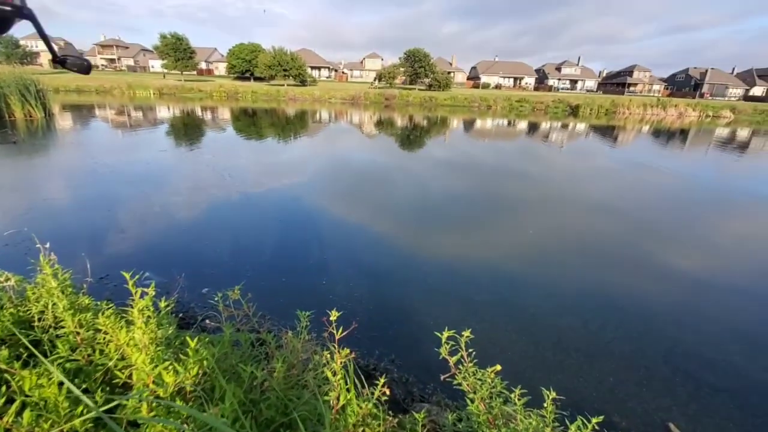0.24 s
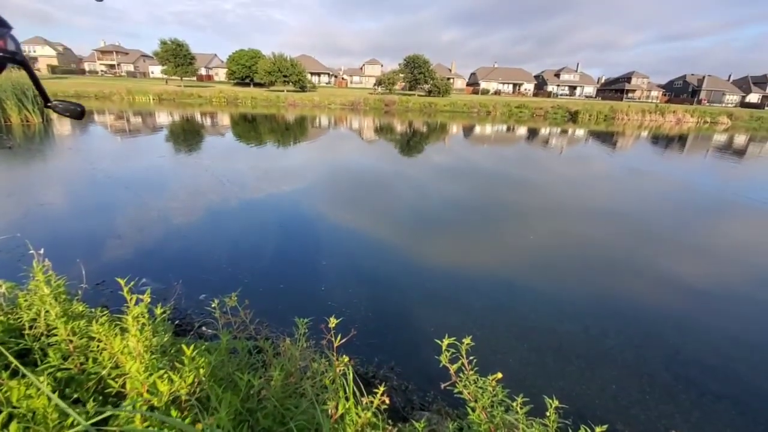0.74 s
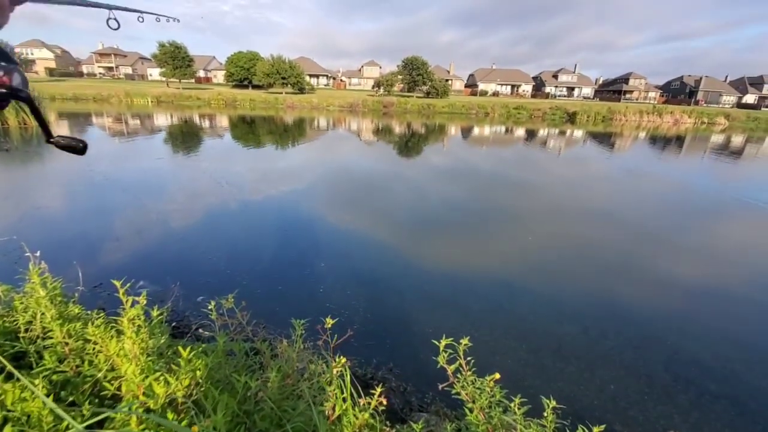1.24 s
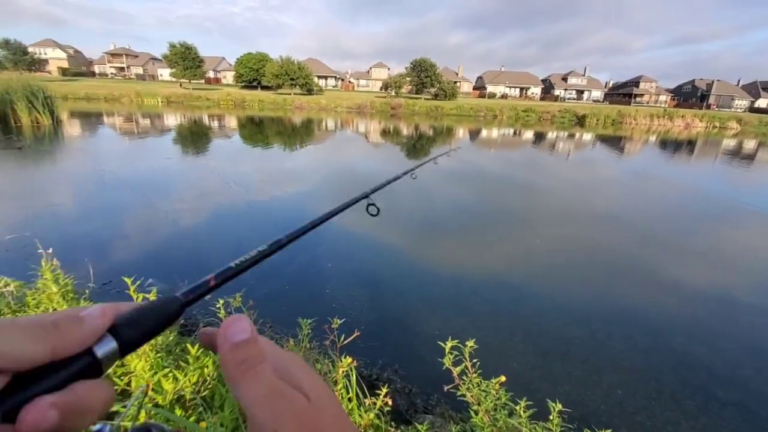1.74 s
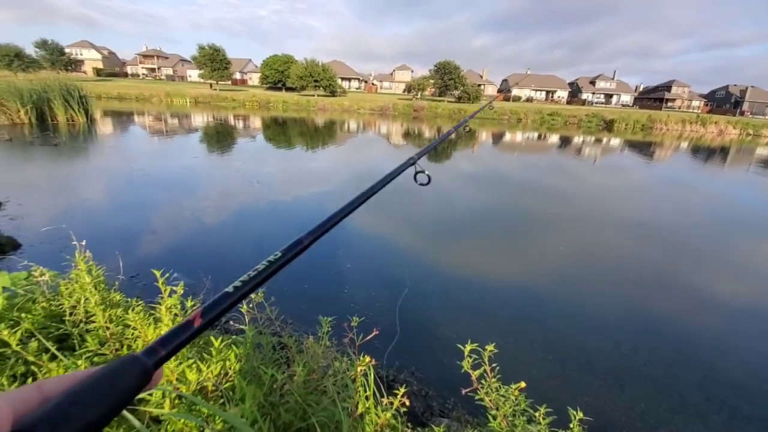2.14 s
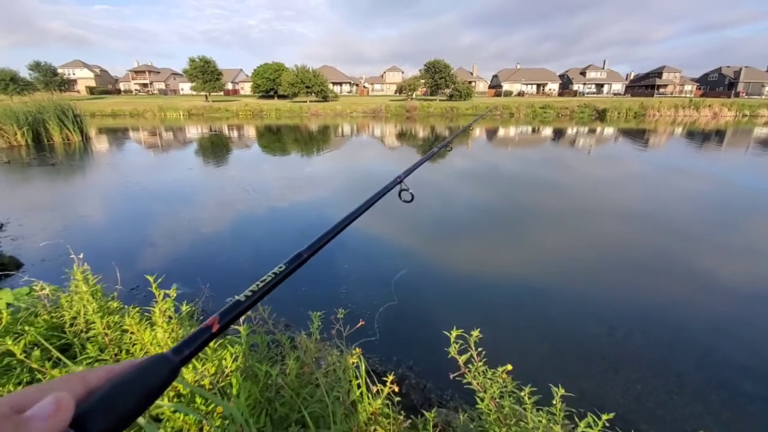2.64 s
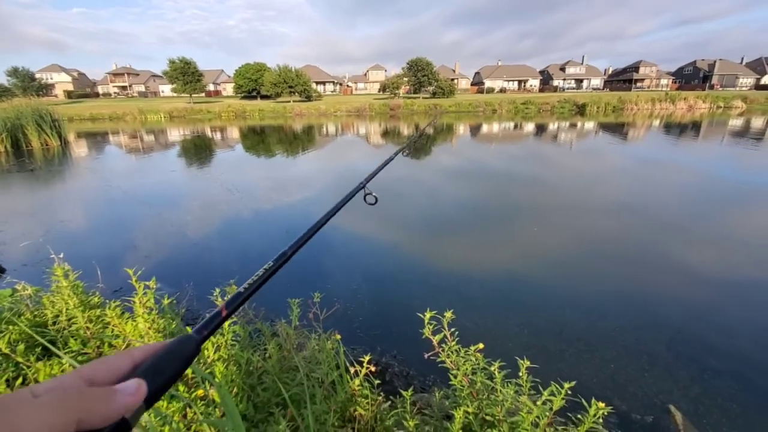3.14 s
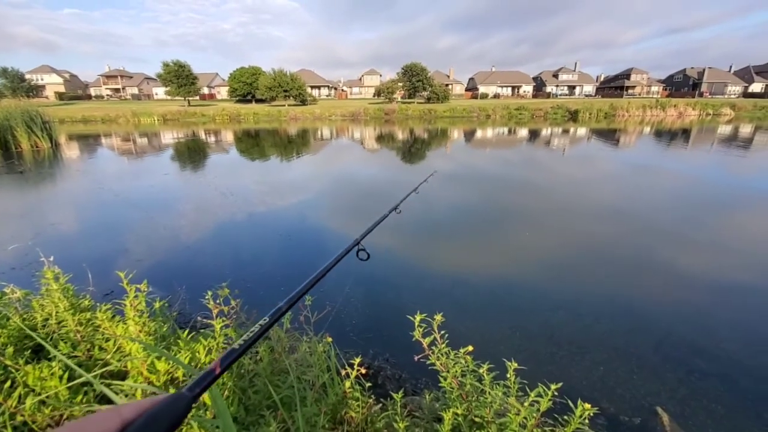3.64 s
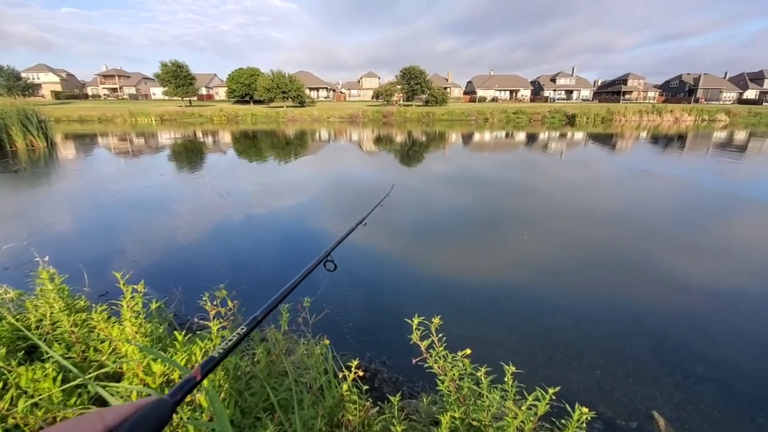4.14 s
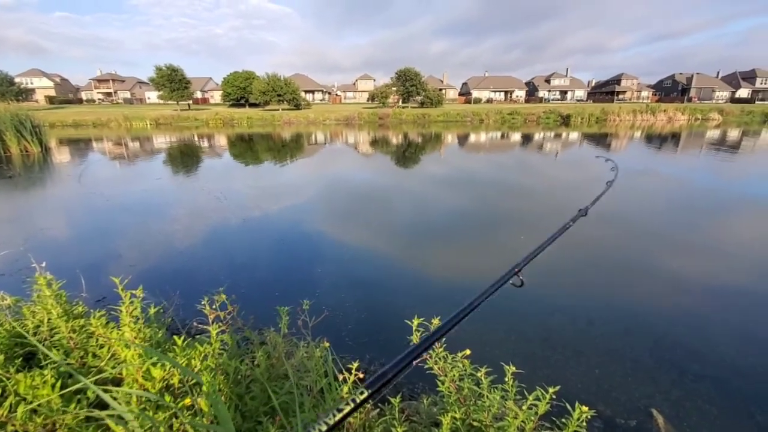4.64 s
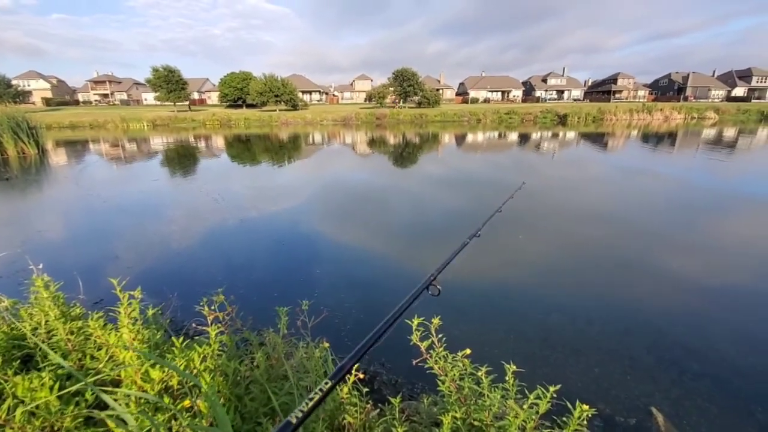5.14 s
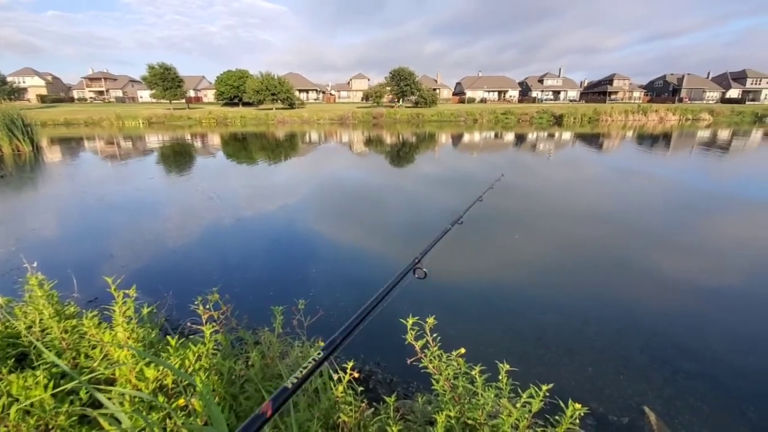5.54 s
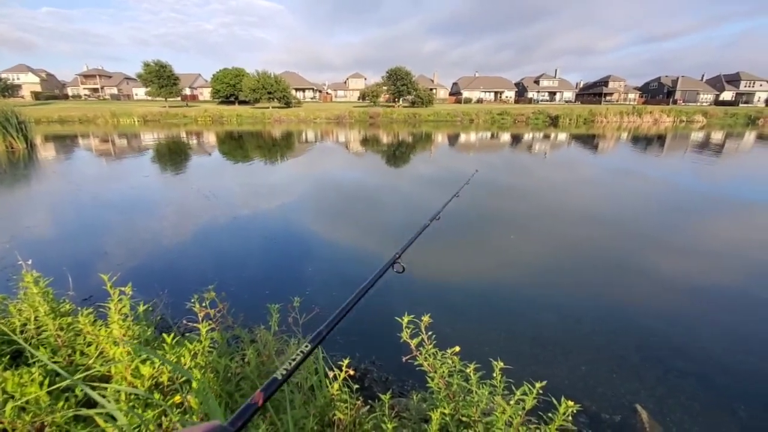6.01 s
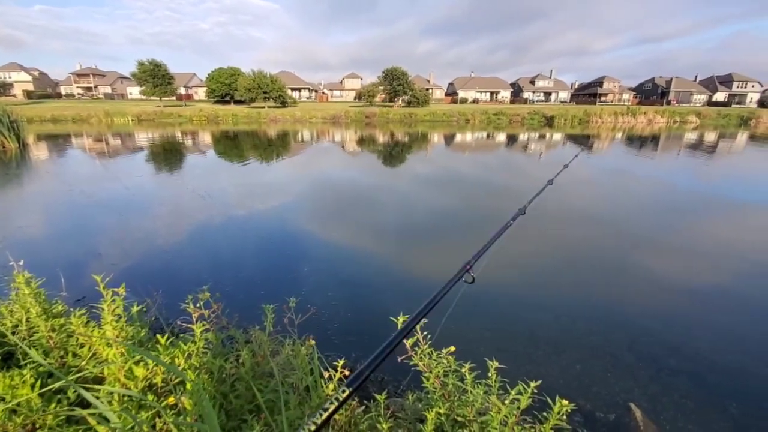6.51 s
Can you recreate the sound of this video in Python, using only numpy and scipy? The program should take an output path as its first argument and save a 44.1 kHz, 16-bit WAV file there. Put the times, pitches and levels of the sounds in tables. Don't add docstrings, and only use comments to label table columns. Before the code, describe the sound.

A close fishing reel is handled on a grassy bank: faint taps, one very loud metallic snap early on, a brief lull with low wind buffeting, a cluster of ticks, then gentle uneven winding with dull clicks. Behind it, two choirs of crickets trill without pause, a distant bird chips and whistles downward, and soft traffic rumble sits low. Open air, dry, wide stereo microphone exposed to light breeze.

```python
import sys
import numpy as np
from scipy import signal
from scipy.fft import rfft, irfft, next_fast_len
from scipy.io import wavfile
from scipy.ndimage import uniform_filter1d, map_coordinates

SR = 44100
rng = np.random.default_rng(int(sys.argv[2]) if len(sys.argv) > 2 else 0)


def elevation(decibels):
    levels = np.asarray(decibels, float)
    return 10 ** (levels / 20)


def digitize_waveform(pressure):
    field = np.atleast_2d(pressure).T
    bounded = np.clip(field, -1, 1)
    quanta = np.round(bounded * 32767).astype(np.int16)
    wavfile.write(sys.argv[1], SR, quanta)


N = 298680
T = np.arange(N) / SR

# frequency_hz, density_db
RUMBLE_SPECTRUM = [(15, -30), (30, -17.5), (64, 1), (100, -1.5), (150, -0.5), (260, -12), (500, -16.5),
                   (900, -23.5), (1500, -51), (2500, -120)]
HISS_SPECTRUM = [(200, -44), (500, 0), (900, -1.5), (1500, 2), (2600, -0.5), (3100, -2.5), (4000, -13),
                 (5200, -9), (7400, -8), (8700, -30), (9600, -15), (15600, -57), (15750, -120)]
FIZZ_SPECTRUM = [(6000, -65), (8700, 6.5), (9700, -2.5), (12000, 2.5), (13500, -1.5), (14200, -15),
                 (15680, 1), (15750, -120)]
# frequency_hz, density_db
ROD_SPECTRUM = [(250, -60), (400, -12), (800, -8.5), (1300, -4), (1850, -1.5), (2400, -9), (3500, -11.5),
                (5000, -17), (10000, -29), (16000, -22)]
# frequency_hz, likeness (0 to 1)
COHERENCE = [(30, .8), (60, 1), (100, 0.88), (200, 0.98), (600, 0.61), (1300, 0.56), (3000, 0.91),
             (5000, 0.79), (8500, 1), (11000, 0.17)]
RUMBLE_DB, HISS_DB, FIZZ_DB, BRIGHT_DB = -44.5, -56.5, -66.5, -81
HISS_FOLLOWS, FIZZ_FOLLOWS_WINDING, FIZZ_FOLLOWS_SIZZLE = 0.042, 0.13, 0.16

# middle_s, width_s, level_db
GUSTS = [(.21, 0.09, -58), (1.3, 0.13, -60), (1.85, 0.13, -48.5), (2.22, 0.24, -44.5), (2.68, 0.2, -42.5),
         (3.15, 0.22, -52), (3.7, .1, -54), (4.07, .05, -52), (4.35, .15, -49), (4.72, 0.11, -46),
         (5.15, 0.33, -56), (6.62, 0.067, -50)]
CALM_DB = -76

# start_s, low_choir_db, high_choir_db, treble_shade_db (by the angler's body)
CHOIR_EFFORT = [(0.0, -49.5, -46.5, -3), (0.53, -47.5, -46.5, -3), (0.92, -48.5, -46.5, -2),
                (1.4, -48.5, -48.5, -1), (1.6, -51, -46.5, -6), (1.81, -51.5, -50.5, -5.5),
                (2.22, -54.5, -48.5, -13), (2.87, -53, -51.5, -7.5), (3.85, -49.5, -49, -7),
                (4.25, -50.5, -49, -5.5), (5.15, -48.5, -50.5, 0), (6.13, -49.5, -50.5, -1),
                (6.77, -48, -51, 0)]
# wing_hz, pulse_rate_hz, level_db, left_lead_ms
LOW_SINGERS = [
    (6240, 53.0, 0, -.025),
    (6160, 55.1, -6, -.3),
    (6330, 50.3, -4, .4),
    (6400, 56.5, -5, -.1),
    (6010, 48.5, -15, .2),
    (5830, 51, -23, -.2),
]
HIGH_SINGERS = [
    (6550, 51.7, 0, -.045),
    (6480, 54.6, -5, .3),
    (6630, 49.2, -7, -.4),
    (6770, 47.5, -18, 0),
]
OCTAVE_DB, LOW_OCTAVE_DB = -59.5, -2.5
TURN_S, TURN_LENGTH_S, BEFORE_DB, DURING_DB, AFTER_DB = 2.15, 0.93, -2.5, -1, -4.5

# start_s, length_s, top_hz, top_db
CHIPS = [
    (.045, 0.065, 4580, -52),
    (.885, 0.048, 4700, -44),
    (1.97, 0.036, 4620, -50.5),
    (2.795, .04, 4540, -47),
    (3.73, .05, 4470, -46.5),
    (4.64, 0.048, 4600, -45),
    (4.848, 0.085, 4420, -46.5),
    (5.485, 0.049, 4440, -55),
    (6.3, 0.053, 4380, -57),
]
RISES = [
    (.1, .14, 4340, -58),
    (.95, 0.11, 4310, -53),
    (2.87, 0.13, 4210, -63),
    (3.82, 0.11, 4160, -53.5),
    (4.7, .13, 4280, -53),
    (5.56, 0.1, 4120, -64),
]
# length_share, pitch_ratio, level_db (over the top of the note)
CHIP_SHAPE = [
    (0, .93, -11),
    (.25, 1, 0.5),
    (.6, 0.98, -5),
    (1, .915, -19),
]
RISE_SHAPE = [
    (0, .95, -8),
    (.1, 0.97, -9),
    (.75, 1, -1.5),
    (.88, 0.98, 2),
    (1, 1, -16),
]
# top_s, top_hz, top_db, tail_s, tail_db
FALLS = [
    (0.277, 4680, -52, .145, -57),
    (1.109, 4500, -55, .16, -59),
    (2.212, 4440, -52, 0.065, -56),
    (3.027, 4340, -52, 0.069, -51),
    (3.975, 4380, -57, .05, -55.5),
    (5.7, 4380, -61, .06, -67),
    (6.485, 4520, -62, 0.091, -63),
]
HOLD_S, LEAD_S, LEAD_PITCH, LEAD_DB = 0.0122, 0.019, 0.9, -12
BREAK_S, BREAK_HZ, BREAK_DB, SAG_HZ_PER_S, TAIL_PEAK, TAIL_END_DB = .042, 4144, -11, 2600, 0.6, -15

# start_s, winding_db, sizzle_db
HANDS = [(0.0, -57, 2), (.49, -68, 0), (.85, -66, -6), (1.24, -54, -1), (1.62, -70, -3), (1.92, -72, 9),
         (2.2, -65, -7), (2.58, -66, 6), (2.96, -60, -7), (3.15, -54.5, 3), (3.4, -49, 6), (3.67, -49.5, 8),
         (3.9, -51, -3), (4.2, -59.5, 5), (4.34, -55.5, 9), (4.6, -56, -1), (5.86, -55.5, -3),
         (6.77, -56, 2)]
# start_s, peak_db, ring_hz, left_minus_right_db
KNOCKS = [(0.34, -39, 1630, 2), (1.3209, -41, 2250, 2), (1.4536, -37, 2340, 3), (1.6487, -35, 2110, 6),
          (1.736, -39, 2210, 10), (1.9864, -44.5, 2270, 12), (2.7277, -42, 930, -2.0),
          (2.7375, -41, 1750, -5), (2.7505, -36, 1690, -12), (2.7774, -55, 1820, -0.5),
          (2.941, -29.5, 1960, -1.0), (3.455, -34.5, 1850, 2), (3.697, -39, 1980, -3),
          (3.9569, -35.5, 1950, 5), (4.4595, -39, 1720, 3), (4.5364, -34.5, 2400, 4),
          (4.7899, -40, 1740, 3), (4.8457, -29, 1880, 1), (4.9861, -38.5, 2340, 3),
          (5.1871, -37.5, 2020, -0.5), (5.4515, -39, 2040, 1.5), (5.5413, -43, 2550, 0.0),
          (5.747, -33.5, 1910, 1), (5.8052, -41, 1840, -3), (6.087, -39, 1730, 0.5), (6.2168, -43, 1840, 3),
          (6.322, -34.5, 1900, 0.5)]
KNOCK_T60 = 0.0095
# start_s, peak_db, ring_hz, left_minus_right_db, t60_s
SNAP = [(2.0284, -35, 1700, -3, 0.0074), (2.031, -34, 4800, -9, 0.014), (2.0352, -29, 1900, -2, .012),
        (2.043, -17, 1764, 0, .013), (2.0455, -4.6, 1800, -1, 0.0097), (2.047, -32, 490, -3, 0.028),
        (2.0499, -25, 1160, -2, 0.016), (2.0475, -24.5, 875, -2, 0.029), (2.0496, -22, 1680, 4, 0.017),
        (2.0559, -29, 1740, 4, .012), (2.0603, -28, 1550, 0, 0.0075), (2.063, -35, 700, 5, 0.015),
        (2.068, -39, 1500, 0, .012)]
# start_s, peak_db, wire_share_db
# (4.7-7 kHz), left_minus_right_db, t60_s
TICKS = [(1.0404, -61, -10, -5.5, 0.015), (1.4534, -52, 3, -4.5, 0.015), (2.0298, -18.5, -19, -3, 0.011),
         (2.041, -26.5, -21, 6, 0.019), (2.0504, -35.5, -11, 1, 0.066), (2.076, -56, -4, -14, 0.024),
         (2.7204, -50, -4, -5.5, 0.015), (2.728, -41.5, 2.5, -5, 0.02), (2.7372, -33, -1, -5, 0.016),
         (2.75, -33.5, -2, -5, 0.024), (2.7774, -56, -7, -2, 0.015), (2.9323, -49, 11, -12, 0.023),
         (2.9397, -71, 19, -1.5, 0.024), (4.459, -42.5, -5, 3, 0.013),
         (2.0432, -17.5, -21, -1, 0.013),
]

MIC_TOP_HZ = 15500
DUCK_S, DUCK_DB, DUCK_RECOVER_S = 2.08, -2, 0.31


def unit(x):
    return x / np.sqrt(np.mean(x ** 2) + 1e-20)


def along(points, hz):
    f, v = np.transpose(points)
    return np.interp(np.log(hz + 1), np.log(f + 1), v)


def curves(rows):
    s, *cols = np.transpose(rows)
    return [np.interp(T, s, c) for c in cols]


def wobble(rate):
    coarse = T[::32]
    knots = rng.standard_normal(int(N * rate / SR) + 4)
    return np.interp(T, coarse, map_coordinates(knots, [coarse * rate]))


def filtered(x, response):
    m = next_fast_len(N + SR // 2)
    return irfft(rfft(x, m) * response(np.fft.rfftfreq(m, 1 / SR)), m)[..., :N]


def band(hz, centre_hz, width_hz):
    return 1j * hz * width_hz / (centre_hz ** 2 - hz ** 2 + 1j * hz * width_hz)


def placed(x, lead_ms):
    left, right = x * np.ones((2, 1))
    return np.array([left, np.roll(right, round(lead_ms * SR / 1000))])


def sides(pan_db):
    return elevation(np.array([pan_db / 2, -pan_db / 2]).reshape(2, -1))


def rush(spectrum, alike, patchy_db):
    z = signal.stft(rng.standard_normal((2, N)), nperseg=512)[2]
    field = uniform_filter1d(rng.standard_normal(z.shape[1:]), size=6, axis=0)
    field = uniform_filter1d(field, size=14, axis=1)
    pair = signal.istft(z * elevation(patchy_db * unit(field)), nperseg=512)[1][:, :N]

    def mid_side(hz):
        angle = np.arccos(np.clip(along(alike, hz), -1, 1)) / 2
        return elevation(along(spectrum, hz)) * [np.cos(angle), np.sin(angle)]

    mid, side = filtered(pair, mid_side)
    return unit(np.array([mid + side, mid - side]))


def scatter(x, t60):
    t = np.arange(SR // 8) / SR
    tail = rng.standard_normal((2, len(t))) * elevation(-60 * t / t60)
    return signal.oaconvolve(x, tail / np.linalg.norm(tail[0]), axes=1)[:, :N]


def town_rumble():
    level = elevation(RUMBLE_DB + 1.5 + 0.41 * wobble(4.1))
    rumble = level * rush(RUMBLE_SPECTRUM, COHERENCE, patchy_db=1.0) * sides(np.array(-1.2))
    return placed(rumble, lead_ms=0.18)


def distant_hiss():
    winding_db, _ = curves(HANDS)
    level = elevation(HISS_DB + HISS_FOLLOWS * (winding_db - winding_db.mean()) + 7)
    return placed(level * rush(HISS_SPECTRUM, COHERENCE, patchy_db=2.0), lead_ms=.5)


def breeze():
    low = signal.butter(2, [26, 58], "band", fs=SR, output="sos")
    puffs = signal.sosfilt(low, rng.standard_normal((2, N)))
    strength = elevation(CALM_DB) + sum(elevation(db) * np.exp(-((T - s) / width) ** 2) for s, width, db in GUSTS)
    return strength * unit(puffs) * sides(np.array(-5.))


def cricket(wing_hz, rate, octave, duty, sweep, uneven_db):
    strokes = np.cumsum(rate * (1 + .006 * wobble(3.023))) / SR + rng.random()
    index = strokes.astype(int)
    u = np.clip(strokes % 1 / duty, 0, 1)
    luck = rng.standard_normal((500, 3))[index]
    pitch = wing_hz * (1 - sweep * (u - .5) + 0.0055 * luck[:, 0])
    phase = 2 * np.pi * np.cumsum(pitch) / SR + 3 * luck[:, 1]
    swell = np.sin(np.pi * u ** 0.49) * elevation(uneven_db * luck[:, 2])
    return swell * (np.sin(phase) + octave * np.sin(2 * phase))


def crickets():
    low_db, high_db, shade_db = curves(CHOIR_EFFORT)
    turn_s = TURN_S + TURN_LENGTH_S * np.array([-.5, 0, 1])
    pan_db = np.interp(T, turn_s, [BEFORE_DB, DURING_DB, AFTER_DB])
    octave = elevation(OCTAVE_DB + shade_db - low_db - 7) * sides(np.array(-5.))
    song = 0
    for singers, level_db, tilt_db in ((LOW_SINGERS, low_db, LOW_OCTAVE_DB), (HIGH_SINGERS, high_db, 1.5)):
        choir = 0
        for hz, rate, db, lead_ms in singers:
            trill = cricket(hz, rate, octave * elevation(tilt_db), duty=.65, sweep=.025, uneven_db=1.4)
            voice = elevation(db) * placed(trill, lead_ms)
            choir = choir + voice + elevation(-2) * scatter(voice, t60=0.25)
        song = song + elevation(level_db + 3.0) * unit(choir)
    return song * sides(pan_db)


def notes():
    out = []
    for rows, shape in ((CHIPS, CHIP_SHAPE), (RISES, RISE_SHAPE)):
        for s, length, hz, db in rows:
            out.append([(s + u * length, hz * ratio, db + under) for u, ratio, under in shape])
    for s, hz, db, tail, tail_db in FALLS:
        def sag(share, level):
            return s + BREAK_S + share * tail, BREAK_HZ - SAG_HZ_PER_S * share * tail, level

        climb = [(s - LEAD_S, hz * LEAD_PITCH, db + LEAD_DB), (s, hz, db), (s + HOLD_S, hz, db)]
        out.append(climb + [sag(0, tail_db + BREAK_DB), sag(TAIL_PEAK, tail_db), sag(1, tail_db + TAIL_END_DB)])
    return out


def bird():
    song = np.zeros(N)
    for note in notes():
        s, hz, db = np.transpose(note)
        span = slice(round(s[0] * SR), round(s[-1] * SR))
        t = T[span]
        edges = np.clip(np.minimum(t - s[0], s[-1] - t) / 0.0052, 0, 1)
        phase = 2 * np.pi * np.cumsum(np.interp(t, s, hz)) / SR
        song[span] = edges * elevation(np.interp(t, s, db) + 1) * np.sin(phase)
    direct = placed(song * elevation(1.6 * wobble(45)), lead_ms=.47) * sides(np.array(-4.))
    return direct + elevation(-9) * scatter(direct, t60=.12)


def line_fizz():
    winding_db, sizzle_db = curves(HANDS)
    busy_db = winding_db - winding_db.mean()
    fizz_db = FIZZ_DB + FIZZ_FOLLOWS_WINDING * busy_db + FIZZ_FOLLOWS_SIZZLE * sizzle_db
    noise = rush(FIZZ_SPECTRUM, [(9000, .5), (13000, .1)], patchy_db=.7)
    fizz = elevation(fizz_db + 3) * noise * sides(np.array(1.))
    sizzle = signal.sosfiltfilt(signal.butter(4, 13900, "high", fs=SR, output="sos"), fizz)
    fizz = fizz + (elevation(BRIGHT_DB + sizzle_db - fizz_db + 15.5) - 1) * sizzle
    return placed(fizz, lead_ms=.5)


def gear_whirr():
    winding_db, _ = curves(HANDS)
    teeth = rng.standard_normal(N) * elevation(4.3 * wobble(110))
    housing = unit(filtered(teeth, lambda hz: band(hz, 1983, 500) ** 2))
    return placed(elevation(1.6 * (winding_db + 53.5) - 55.5) * housing, lead_ms=-0.1)


def reel():
    ring, crack, rattle = np.zeros((3, 2, N + SR))
    t = np.arange(SR // 8) / SR
    treble = signal.butter(2, [8500, 15500], "band", fs=SR, output="sos")
    wire = signal.butter(2, [4700, 7000], "band", fs=SR, output="sos")
    for s, db, hz, pan_db, t60 in SNAP + [(*k, KNOCK_T60) for k in KNOCKS]:
        at = round(s * SR)
        u = t / (0.092 * t60)
        blow = elevation(db + 4.0) * (u * np.exp(1 - u)) ** 2 * np.sin(2 * np.pi * hz * t)
        ring[:, at:at + len(t)] += blow * sides(pan_db)
        rattle[:, at:at + len(t)] += elevation(db - 31 - 60 * t / 0.081)
    for s, db, wire_db, pan_db, t60 in TICKS:
        at = round(s * SR)
        rattle[:, at:at + len(t)] += elevation(db + wire_db - 1.5 - 60 * t / 0.052)
        high, mid = rng.standard_normal((2, 2, len(t)))
        fade = (1 - np.exp(-t / 0.0013)) * elevation(db + 8 - 60 * t / t60)
        burst = signal.sosfilt(treble, high) + elevation(wire_db + 10.5) * signal.sosfilt(wire, mid)
        crack[:, at:at + len(t)] += fade * burst * sides(pan_db)
    shake = rattle[:, :N] * rush(ROD_SPECTRUM, [(500, 0.88), (3000, 0.12)], patchy_db=1.0)
    return placed(ring[:, :N] + shake, lead_ms=-0.13) + crack[:, :N]


def scene():
    background = town_rumble() + distant_hiss() + breeze()
    return background + crickets() + bird() + line_fizz() + gear_whirr() + reel()


def band_limit(x):
    return signal.sosfilt(signal.butter(12, 16600, fs=SR, output="sos"), x)


def record(dry):
    u = np.clip(T - DUCK_S, 0, None) / DUCK_RECOVER_S
    ducked = dry * elevation(DUCK_DB * np.clip(8 * u, 0, 1) * np.exp(-u ** 2))
    limited = ducked / (1 + np.abs(ducked / .97) ** 8) ** (1 / 8)
    mix = filtered(limited, lambda hz: 1 / (1 + (hz / MIC_TOP_HZ) ** 30))
    return band_limit(mix)


dry = scene()
out = record(dry)
digitize_waveform(out)
```